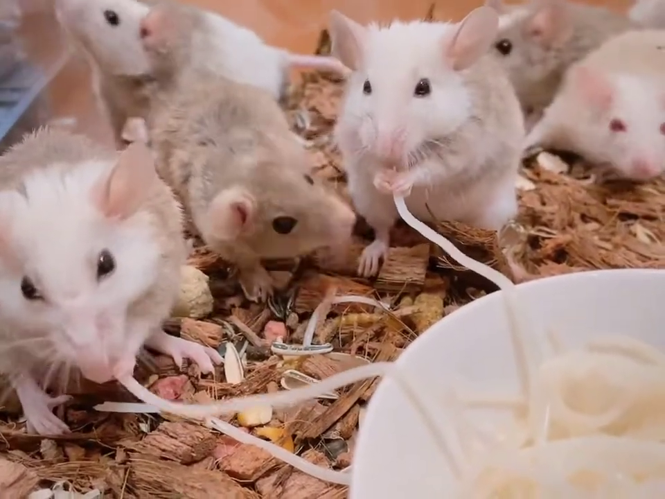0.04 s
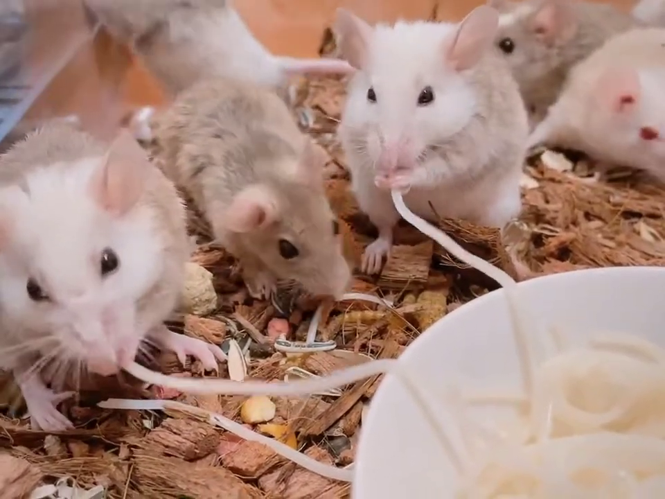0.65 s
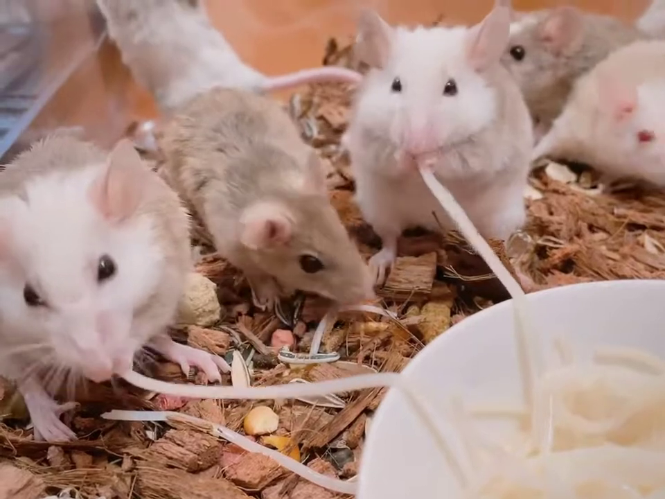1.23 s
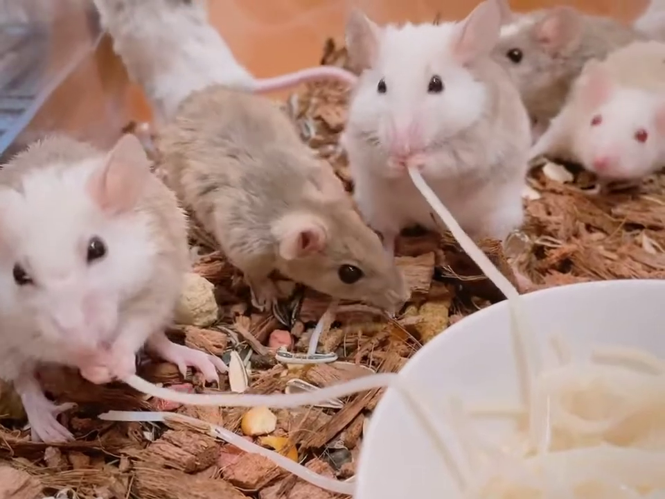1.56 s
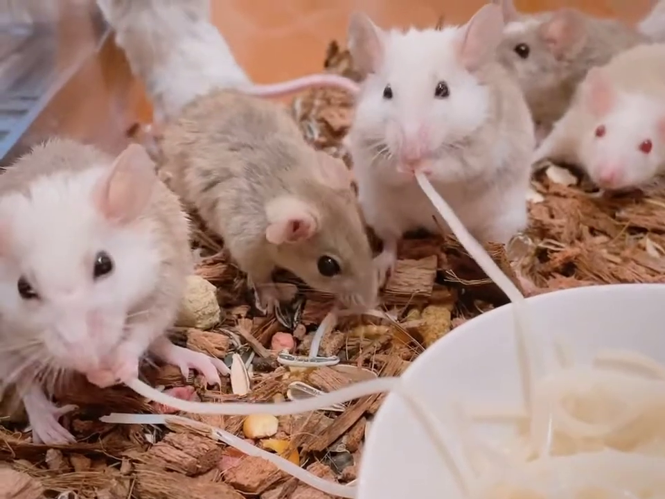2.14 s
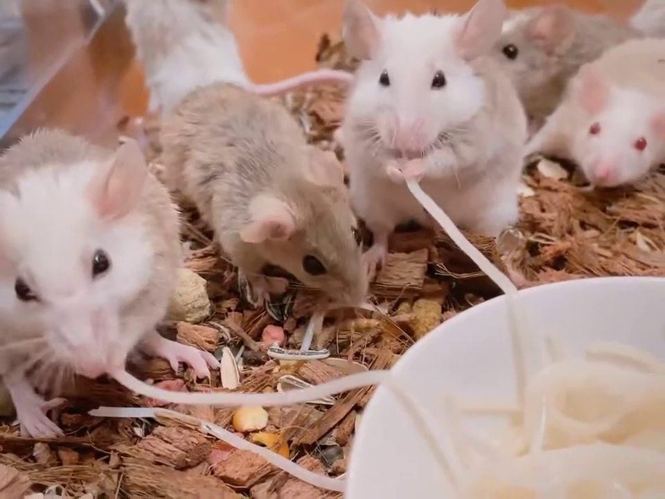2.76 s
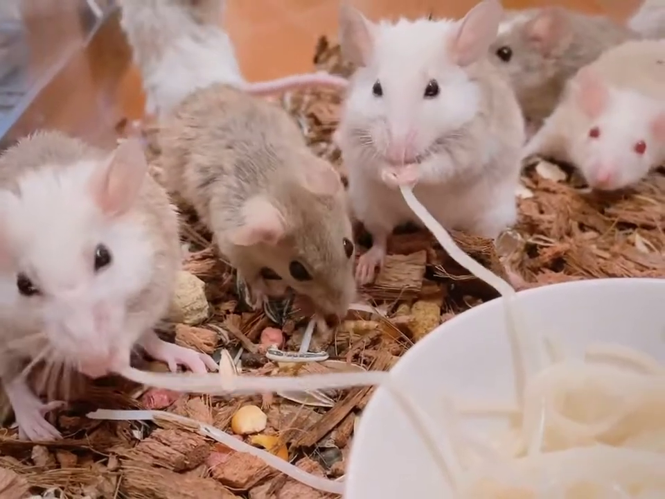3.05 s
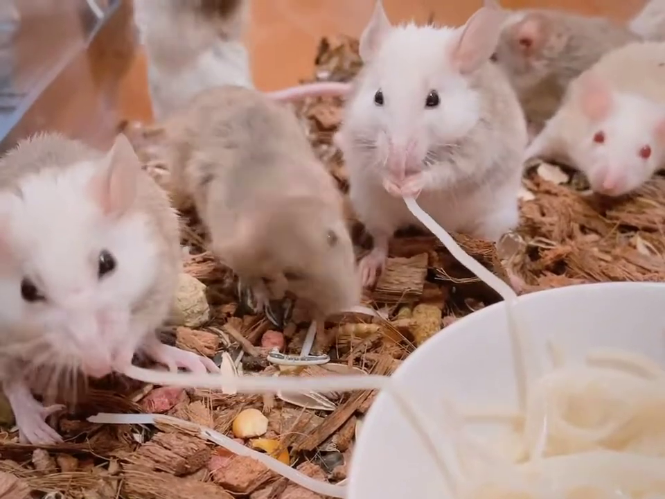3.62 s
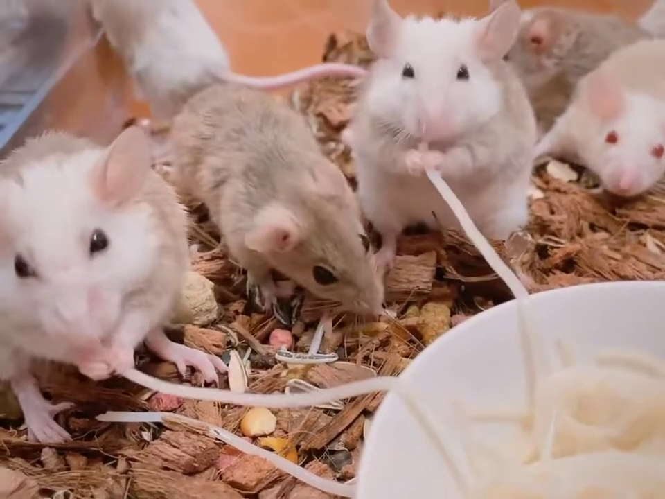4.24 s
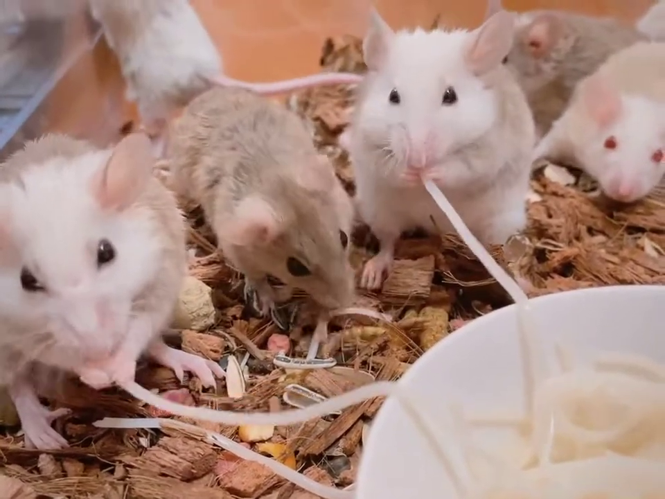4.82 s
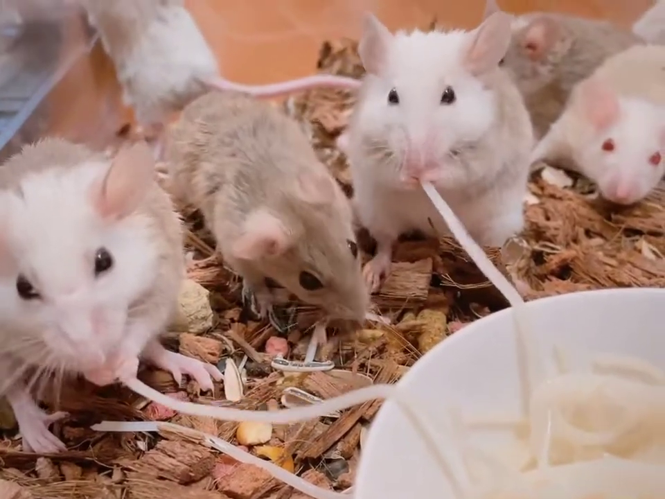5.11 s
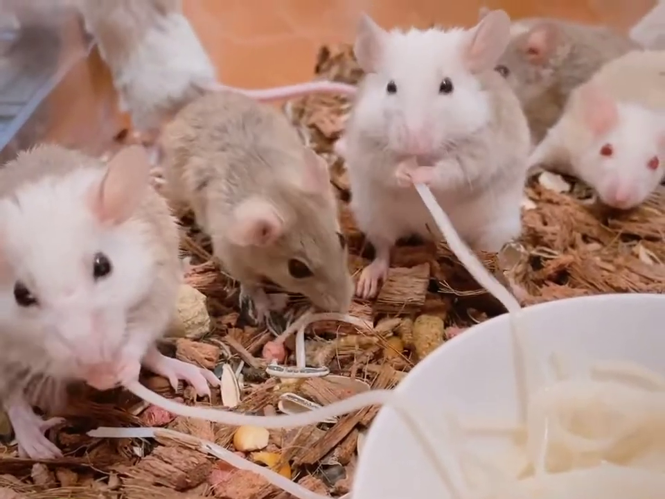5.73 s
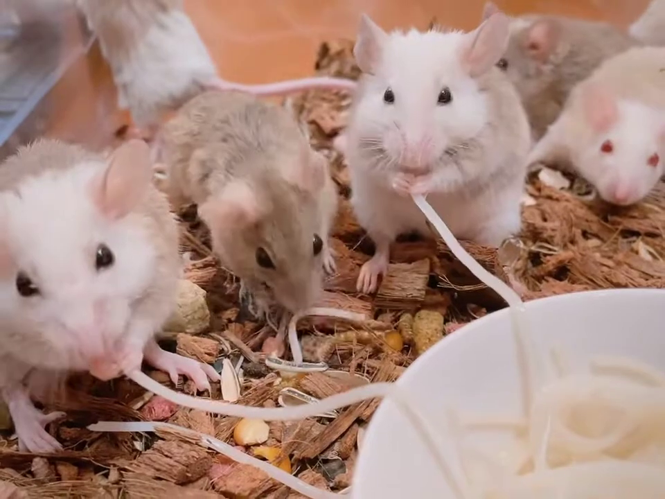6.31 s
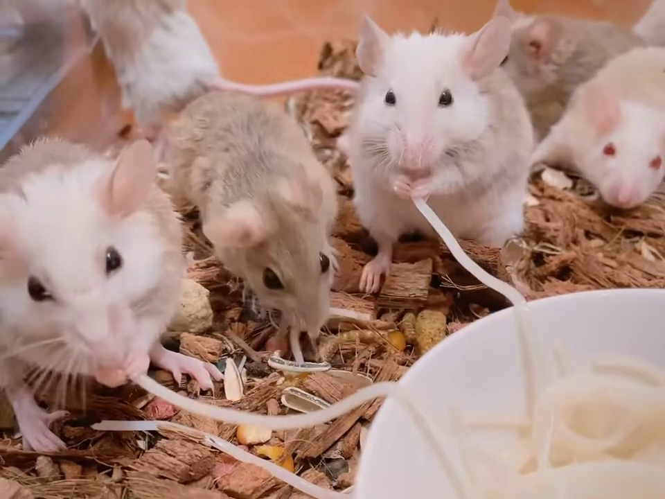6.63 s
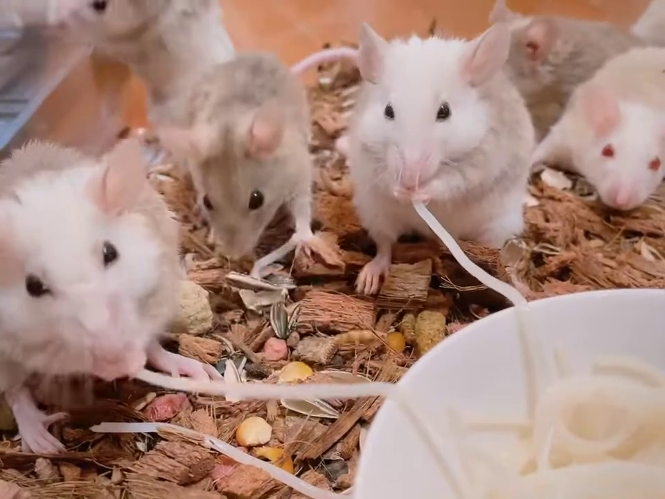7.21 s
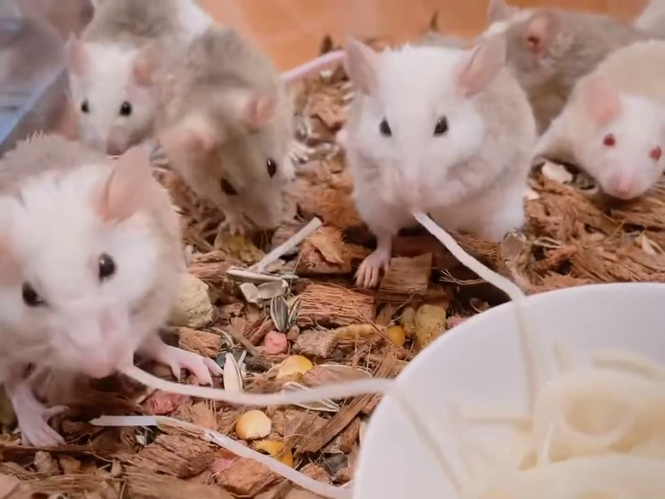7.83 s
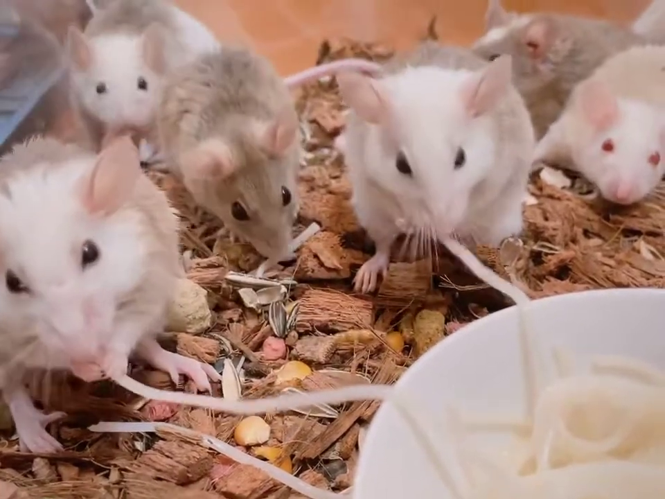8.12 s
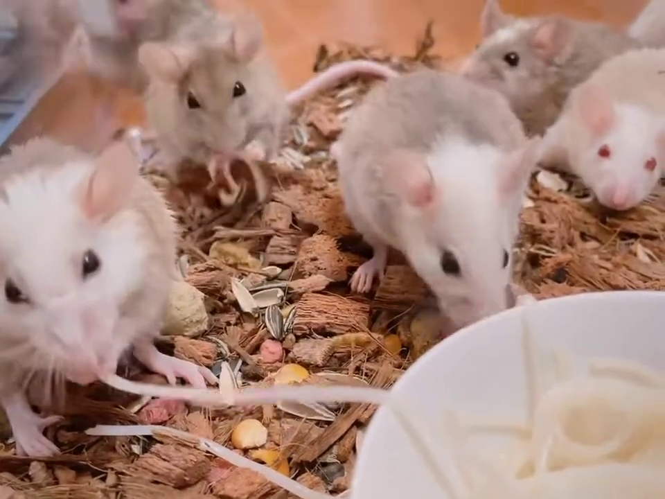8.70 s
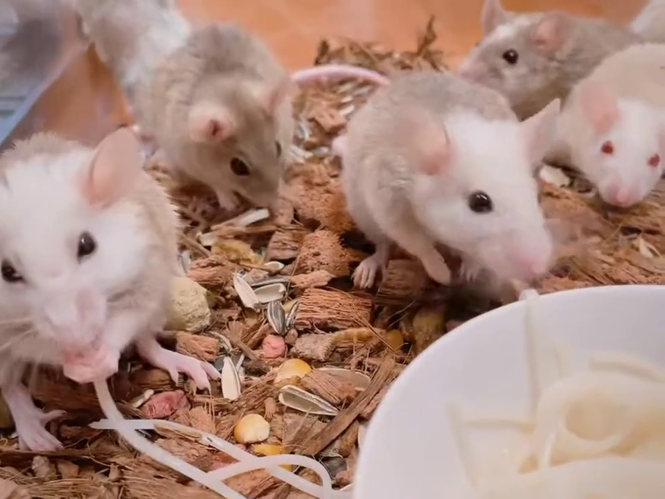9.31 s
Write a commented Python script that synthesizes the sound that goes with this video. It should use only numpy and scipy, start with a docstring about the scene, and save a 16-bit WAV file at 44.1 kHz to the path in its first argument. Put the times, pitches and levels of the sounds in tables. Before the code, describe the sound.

A fan hums steadily in a quiet room while nearby mice rustle and crackle through wood-chip bedding, dotted with tiny blips from a focus motor. A short squeak and soft knocks on the tub come first, then three crisp bites on a husk and two low thumps. A flicked chip rings lightly against something hard, and near the end a mouse squeaks twice, very high, before one more soft bump.

```python
"""A fan hums in a quiet room while mice stir wood chips in a tub, close to a camera whose focus motor
blips now and then. Chips snap and scrape throughout. Early on a mouse squeaks, fur brushes past and
the tub is bumped. Just after 3 s teeth crack a seed husk, and the two hardest thuds follow.
Near 7 s a flicked chip makes something hard ring. Near 9 s come two more thin squeaks,
then one last scuff and bump."""
import sys
import numpy as np
from scipy import signal
from scipy.fft import rfft, irfft, next_fast_len
from scipy.io import wavfile
from scipy.ndimage import map_coordinates

SR = 44100
rng = np.random.default_rng(int(sys.argv[2]) if len(sys.argv) > 2 else 0)


def output_pcm(signal):
    """Save a mono or channel-first signal as 16-bit PCM at the path in sys.argv[1].

    Samples are clipped to [-1, 1] before scaling.
    """
    pcm = np.clip(np.atleast_2d(signal).T, -1, 1) * 32767
    wavfile.write(sys.argv[1], SR, np.round(pcm).astype(np.int16))


N = 421596


def amp(db):
    """Turn decibels into a number to multiply by."""
    return 10 ** (np.asarray(db) / 20)


def unit(x):
    """Scale x to an average strength (rms) of 1."""
    return x / np.sqrt(np.mean(x ** 2) + 1e-20)


def along(points, hz):
    """Read between (f/Hz, value) points, with the octaves evenly spaced."""
    f, v = np.transpose(points)
    return np.interp(np.log(hz + 1), np.log(f + 1), v)


def resonances(modes, f):
    """Gain at frequencies f for an object that favours a few pitches, its modes."""
    return np.sqrt(sum(amp(db) ** 2 / (1 + (2 * (f - hz) / width) ** 2) ** 2 for hz, width, db in modes))


def wobble(rate, size=N):
    """A smooth curve through `rate` random values a second."""
    values = rng.standard_normal(int(size * rate / SR) + 4)
    return map_coordinates(values, [np.arange(size) * rate / SR])


def filtered(x, response):
    """Turn each frequency f in x up or down by response(f)."""
    padded = next_fast_len(len(x) + 8192)
    return irfft(rfft(x, padded) * response(np.fft.rfftfreq(padded, 1 / SR)), padded)[:len(x)]


def band(x, centre_hz, octaves):
    """Keep the part of x around one pitch, at strength 1; more octaves make it wider."""
    return unit(filtered(x, lambda hz: np.exp(-.5 * (np.log2((hz + 1) / centre_hz) / octaves) ** 2)))


def ringing_noise(size, modes, plain=0):
    """Noise coloured by an object's modes, at strength 1; `plain` fills the gaps between them."""
    return unit(filtered(rng.standard_normal(size), lambda f: np.hypot(plain, resonances(modes, f))))


def grains(size, rate, spread_db):
    """Tiny cracks at random moments, about `rate` a second, a few much louder than the rest."""
    cracks = (rng.random(size) < rate / SR) * rng.standard_normal(size)
    return unit(cracks * amp(spread_db * rng.standard_normal(size).clip(-2, 2)))


def add(track, s, sound):
    """Mix a sound into the track, starting at s seconds."""
    start = max(round(s * SR), 0)
    track[start:start + len(sound)] += sound[:max(N - start, 0)]


# how long the room echoes: f/Hz, t60/s (t60 is the time a sound takes to fade by 60 dB)
ROOM_FADE = [(200, 0.4), (2000, 0.13), (14000, 0.1)]
def room(x):
    """The walls give a short, blurred echo whose high notes die first."""
    hz, t, spectrum = signal.stft(rng.standard_normal(SR // 2), SR, nperseg=256)
    fade = amp(-60 * t / along(ROOM_FADE, hz)[:, None])
    tail = signal.istft(spectrum * fade, SR, nperseg=256)[1]
    return signal.fftconvolve(x, tail / np.linalg.norm(tail))[:N]


# hum of the fan and the mains: f/Hz, relative level/dB
HUM_TONES = [(74, -51), (100, -46), (119, -56.5), (139, -48), (199.5, -45.5), (234.5, -47.5), (254, -55),
             (317, -56), (351, -51), (703, -60.5), (763, -65.5), (1089, -70.5), (1771, -76)]
# rush of air in the room, from low to high: f/Hz, relative level/dB
AIR_COLOUR = [(20, -14), (40, -5), (70, -9), (120, 0), (170, -1), (260, -0.5), (370, -1.5), (425, -13.5),
              (470, -4.5), (800, -12.5), (980, -22), (2300, -21), (2560, -30), (2950, -29), (3150, -33.5),
              (5000, -36.5), (11000, -56), (16000, -48)]
# pitches at which the fan's case rings: f/Hz, width/Hz, relative level/dB
FAN_CASE_MODES = [(473, 89, -3.5), (537, 60, 6.5), (678, 31, 3), (769, 34, -0.5), (1077, 72, -6.5),
                  (1185, 42, -2.5), (1271, 47, -2.5), (1324, 430, -7), (1716, 126, -9.5), (1770, 45, -3),
                  (1899, 31, -5.5), (2330, 94, -10), (2770, 110, -14.5), (4230, 320, -27)]
def fan():
    """The motor's tones waver over rushing air, some of which rings in the fan's case."""
    t = np.arange(N) / SR
    tones = np.zeros(N)
    for hz, db in HUM_TONES:
        strength = amp(db + 2.05 * wobble(7)) * np.sqrt(2)
        tones += strength * np.sin(2 * np.pi * hz * t + .9 * wobble(9))
    air = unit(filtered(rng.standard_normal(N), lambda hz: amp(along(AIR_COLOUR, hz))))
    return amp(-1.5) * tones + amp(-42.5) * air + amp(-50) * ringing_noise(N, FAN_CASE_MODES)


# how much the hand sways: t/s, relative level/dB
HAND_SWAY = [(0.0, -56), (1.17, -48.5), (2.23, -60), (3.19, -52), (3.7, -48), (4.44, -64), (9.56, -76)]
def hand_rumble():
    """The camera rumbles faintly as the hand holding it moves."""
    level_db = np.interp(np.arange(N) / SR, *np.transpose(HAND_SWAY)) + 4
    return amp(level_db) * band(rng.standard_normal(N), centre_hz=74, octaves=.47)


# moves of the focus motor: middle t/s, level/dB, top f/Hz, length/s
FOCUS_MOVES = [(0.034, -34, 810, .013), (0.04, -33.5, 1126, .016), (0.648, -31.5, 810, .009),
               (0.658, -33.5, 1097, .02), (0.965, -35, 803, .018), (0.967, -39, 1065, .016),
               (1.293, -35, 830, .011), (1.597, -43, 1050, .008), (3.248, -36, 825, .006),
               (3.253, -36, 1115, .016), (4.1875, -33.5, 1110, .018), (4.670, -31, 835, .006),
               (4.674, -34, 1075, .011), (5.083, -37, 825, 0.009), (5.303, -33.5, 1134, .013),
               (5.588, -29, 815, 0.012), (6.065, -33.5, 865, .007), (6.58, -31, 1120, .013),
               (7.419, -28.5, 844, .011), (7.625, -34.5, 940, .006), (7.630, -34.5, 1090, .008),
               (7.843, -35, 940, .0086), (8.11, -43, 1310, .012), (8.390, -36.5, 1190, .012),
               (8.681, -37.5, 1160, .015)]
# pitches at which the lens's gears ring: f/Hz, width/Hz, relative level/dB
GEAR_MODES = [(3540, 510, 1), (4230, 400, 1)]
def focus_motor():
    """The motor speeds up and slows again in one short blip; the lens and its gears rattle along."""
    out = np.zeros(N)
    for s, db, hz, length in FOCUS_MOVES:
        progress = np.linspace(-1, 1, int(length * SR))
        size = len(progress)
        pitch = hz * (1 - .07 * progress ** 2)  # 7% lower at both ends
        whirr = amp(db) * np.sin(2 * np.pi * np.cumsum(pitch) / SR)
        rattle = amp(-47.5) * band(rng.standard_normal(size), centre_hz=860, octaves=.44)
        gears = amp(-62) * ringing_noise(size, GEAR_MODES)
        add(out, s - length / 2, signal.windows.tukey(size, .61) * (whirr + rattle + gears))
    return out


# a mouse climbing past at the back: t/s, level/dB
FUR_LEVELS = [(0.0, -77), (0.62, -75), (0.76, -65), (0.94, -67), (1.08, -66), (1.37, -61), (1.55, -73),
              (2.2, -90)]
def fur_brush():
    """Fur sliding over chips gives a very high, fluttering hiss."""
    level_db = np.interp(np.arange(N) / SR, *np.transpose(FUR_LEVELS)) + 1.8 * wobble(28)
    return amp(level_db) * band(rng.standard_normal(N), centre_hz=14700, octaves=.14)


# how busy the mice are between single moves: t/s, relative level/dB
BUSTLE_LEVELS = [(0.0, -64.5), (1.3, -61.5), (1.49, -65), (3.03, -69), (3.33, -64.5), (4.66, -72.5),
                 (9.56, -70.5)]
# single stirs of the chips: middle t/s, level/dB, length/s
CHIP_STIRS = [(.03, -62, 0.069), (0.328, -58.5, 0.33), (0.5, -55, 0.11), (0.732, -59, 0.12),
              (.88, -58, 0.073), (1.095, -58.5, 0.18), (1.22, -58, 0.2), (1.358, -54, 0.12),
              (1.665, -58, .08), (1.747, -62, 0.16), (2.092, -51.5, 0.056), (2.293, -59, 0.092),
              (2.494, -65, 0.11), (2.61, -63, .08), (2.818, -63, 0.18), (2.967, -64, .06),
              (3.17, -63, 0.15), (3.304, -60, .06), (3.53, -61, .22), (3.94, -63.5, 0.24), (4.1, -60, 0.06),
              (4.302, -62.5, 0.12), (4.5, -64, 0.09), (4.635, -62.5, 0.16), (5.02, -58, 0.077),
              (5.298, -62, 0.092), (5.45, -62.5, .13), (5.82, -59, 0.12), (6.078, -58, 0.073),
              (6.187, -61, 0.12), (6.357, -61, .06), (6.545, -60, .13), (6.88, -66, 0.17),
              (7.284, -62, 0.17), (7.714, -61, 0.14), (8.077, -61, 0.16), (8.42, -59, 0.083),
              (8.762, -65, 0.43), (9.21, -61, 0.13), (9.366, -60.5, 0.16), (9.54, -63, 0.11)]
# crackle of the chips, from low to high: f/Hz, relative level/dB
CRACKLE_COLOUR = [(1500, 4.5), (3000, 1.5), (4000, 0.5), (5200, -1), (7500, -2.5), (10000, -9.5),
                  (16000, -49)]
# fine hiss of fur on chips, from low to high: f/Hz, relative level/dB
HISS_COLOUR = [(4000, -22), (8000, -4), (11500, -3), (13000, -1), (14500, 1), (16000, 1.5)]
def bedding():
    """Fur, feet and jaws stir the chips in short puffs: a fine hiss, and a crackle that grows with it."""
    def texture(colour, grainy):
        noise = rng.standard_normal(N) + grainy * grains(N, rate=500, spread_db=4)
        return unit(filtered(noise, lambda hz: amp(along(colour, hz))))

    t = np.arange(N) / SR
    bustle = amp(np.interp(t, *np.transpose(BUSTLE_LEVELS)) + .5 + 1.5 * wobble(19))
    puffs = sum(amp(db) ** 2 * np.exp(-(2.67 * (t - s) / length) ** 2) for s, db, length in CHIP_STIRS)
    catch_and_slip = amp(1.6 * wobble(90))
    hiss = np.sqrt(bustle ** 2 + puffs) * catch_and_slip
    crackle = amp(-60 + 1.6 * wobble(22)) * (hiss / amp(-60)) ** .39  # grows .39 dB per dB of hiss
    return crackle * texture(CRACKLE_COLOUR, grainy=.47) + hiss * texture(HISS_COLOUR, grainy=.28)


# bumps on the tub, each at its loudest moment: t/s, level/dB, rough f/Hz, pitch fall/s, fade/s
TUB_BUMPS = [(.269, -32, 289, 0.23, .012), (.472, -34, 189, 0.32, .025), (1.236, -29.5, 490, 0.23, .012),
             (1.246, -26.5, 335, 0.4, 0.026), (1.243, -23, 160, 0.22, 0.017), (1.255, -24, 131, .1, 0.0054),
             (1.271, -25.5, 219, 0.096, 0.011), (1.294, -32, 85.6, 0.11, 0.056),
             (1.360, -31, 190, .05, 0.0062), (1.718, -24, 135, 0.21, 0.01), (1.736, -25.5, 165, 0.3, 0.01),
             (1.751, -28, 151, 0.18, 0.02), (1.908, -35, 227, 0.061, 0.021),
             (3.628, -25.5, 388, 0.0292, 0.0076), (3.642, -6.5, 100.4, 0.0204, 0.014),
             (3.741, -31, 171, 0.023, 0.0063), (3.842, -30, 331.4, 0.031, 0.0055),
             (3.850, -13, 98.8, .028, 0.021), (9.5218, -28.5, 231, 0.069, 0.008),
             (9.522, -32, 520, 0.071, 0.0067)]
def bumps():
    """The tub's floor flexes. High waves arrive first, so each thud drops in pitch; loose bits rattle."""
    lead_s = .03  # time to swell before the loudest moment
    out, t = np.zeros(N), np.arange(SR // 4) / SR - lead_s
    for s, db, hz, fall, fade in TUB_BUMPS:
        rise = .242 * fade
        pitch = hz * (.361 + .654 * np.exp(-np.maximum(t, -3 * rise) / (fall / 2)))
        thud = amp(db) * np.sin(2 * np.pi * np.cumsum(pitch) / SR)
        rattle = amp(-36 + .2 * db) * band(rng.standard_normal(len(t)), centre_hz=235, octaves=.82)
        swelling = np.exp(-np.abs(t / rise / 1.37) ** 1.12)
        fading = np.exp(-np.abs(t / fade) ** 1.4)
        add(out, s - lead_s, np.where(t < 0, swelling, fading) * (thud + rattle))
    return out


# a chip hitting something hard: t/s, level/dB
CHIP_FLICKS = [(6.889, -52.5)]
# the tones that ring after it: f/Hz, relative level/dB, t60/s
CLINK_TONES = [(3768, -1, .22), (5206, -1, .2), (5700, 0, .12), (6175, 3, .36), (6620, -7, .26),
               (8200, -8, .2), (9884, -12, .22), (12060, -8, .2)]
def clinks():
    """A flicked chip sets off a few slightly unsteady tones, each dying at its own speed."""
    out, t = np.zeros(N), np.arange(SR // 2) / SR
    onset = 1 - np.exp(-t / .001)
    for s, db in CHIP_FLICKS:
        for hz, tone_db, t60 in CLINK_TONES:
            tone = np.sin(2 * np.pi * hz * t + 1.1 * wobble(110, len(t)))
            add(out, s, onset * amp(db + tone_db - 60 * t / t60) * tone)
    return out


# paws scuffing through chips: t/s, level/dB, centre f/Hz, rise/s, t60/s, grains per second
PAW_SCUFFS = [(1.229, -38.5, 480, 0.0046, 0.14, 8400), (1.227, -49, 1450, 0.0033, .1, 8100),
              (1.30, -45, 300, .015, .3, 10000), (1.861, -43.5, 1280, 0.002, 0.098, 9000),
              (1.863, -55, 4200, .003, 0.13, 4000), (1.872, -37, 330, .008, 0.13, 10300),
              (2.079, -52, 3800, 0.0042, 0.07, 3000), (3.491, -42, 1200, 0.009, 0.24, 9000),
              (3.486, -52, 4500, 0.0068, 0.17, 2500), (3.93, -59, 5000, 0.03, .2, 850),
              (5.691, -56.5, 3870, 0.0094, 0.32, 820), (6.729, -57.5, 3880, 0.03, .25, 600),
              (6.879, -51, 5000, .008, .06, 5000), (6.889, -47, 5300, 0.0012, 0.36, 3200),
              (6.8885, -54, 11000, .002, .24, 2500), (6.888, -44, 1300, 0.003, 0.37, 9400),
              (6.900, -53, 2900, .012, .25, 3300), (8.626, -55, 2980, 0.0025, 0.091, 3000),
              (8.707, -53.5, 3180, .003, 0.17, 3000), (8.876, -51.5, 12000, 0.0055, 0.26, 5000),
              (8.897, -58, 4800, .008, .12, 1500), (9.516, -36, 780, 0.004, 0.06, 8500)]
# pitches at which the hollow tub rings: f/Hz, width/Hz, relative level/dB
TUB_MODES = [(1140, 250, -1), (1680, 130, 0), (2370, 200, 3), (3800, 400, 2.5), (4900, 300, 0),
             (5270, 400, 3.5), (6230, 220, -4), (8270, 180, 0), (12200, 700, 3)]
def scuffs():
    """A paw pushes chips over each other: many tiny clicks swell and settle, ringing in the tub."""
    out, t = np.zeros(N), np.arange(SR // 2) / SR
    for s, db, hz, rise, t60, rate in PAW_SCUFFS:
        stroke = np.minimum(t / rise, 1) * amp(db - 60 * np.maximum(t - rise, 0) / t60)
        chips = grains(len(t), rate, spread_db=3)
        in_tub = filtered(chips, lambda f: np.hypot(1, resonances(TUB_MODES, f)))
        add(out, s, stroke * band(in_tub, hz, octaves=.72))
    return out


# a mouse's squeaks: t/s, length/s, level/dB, starting f/Hz, held f/Hz
MOUSE_SQUEAKS = [(0.579, 0.007, -46, 7200, 6350), (0.5812, 0.0074, -43.5, 5380, 3930),
                 (0.584, .014, -50, 4600, 4200), (8.884, .026, -44.5, 13300, 9770),
                 (8.924, .012, -47, 11500, 11650)]
def squeaks():
    """A mouse gives thin, slightly rough whistles that slide quickly onto a held pitch and fade."""
    slide_s, fade_db = .0028, 7.5
    out = np.zeros(N)
    for s, length, db, start_hz, held_hz in MOUSE_SQUEAKS:
        t = np.arange(int(length * SR)) / SR
        pitch = held_hz + (start_hz - held_hz) * np.exp(-t / slide_s)
        roughness = 1 + .036 * wobble(1380, len(t))
        whistle = np.sin(2 * np.pi * np.cumsum(pitch * roughness) / SR)
        add(out, s, amp(db - fade_db * t / length) * signal.windows.tukey(len(t), .15) * whistle)
    return out


def settling_ticks(count):
    """Settling chips tick faintly at random moments: extra rows for CHIP_SNAPS below."""
    return [(when * N / SR, -60 + 4 * (size - .5), 8500 * 2 ** (1.5 * (pitch - .5)), .5, .014)
            for when, size, pitch in rng.random((count, 3))]


# chips breaking: t/s, relative level/dB, centre f/Hz, width/octaves, t60/s
CHIP_SNAPS = [(.140, -47, 12000, 0.86, 0.046), (.269, -45, 3500, 0.44, 0.027), (.293, -50, 8200, .25, .02),
              (0.325, -40, 7950, .22, 0.017), (1.445, -42, 12000, .5, .016), (1.862, -38, 6500, 1.6, 0.028),
              (2.065, -45, 14000, .2, .014), (2.300, -49, 11500, .6, .02), (2.484, -50, 11500, .5, .008),
              (2.491, -42, 11500, 0.44, .008), (2.940, -49, 4000, .3, .03), (3.517, -47, 8000, .8, .008),
              (4.098, -50, 3450, .15, .03), (4.165, -49, 13500, .25, .012), (4.317, -47.5, 7000, 0.85, .04),
              (5.128, -51, 4000, 0.33, 0.069), (5.270, -49, 10000, 0.87, .025),
              (5.665, -53, 12000, 0.59, .03), (5.752, -56, 6050, .06, .2), (6.1735, -46, 10500, .5, .015),
              (6.216, -46, 6200, .3, .017), (6.2562, -35.5, 11500, .9, 0.017), (6.295, -51, 8000, .5, .012),
              (6.890, -41, 5500, .9, .02), (6.908, -41, 5500, .7, .006), (7.084, -45, 12000, .6, .01),
              (8.603, -50, 6500, .5, .015), (8.627, -47, 3200, 0.46, .025), (8.673, -48, 5000, 0.76, .02),
              (8.709, -43.5, 3900, 0.45, 0.033), (9.138, -45, 12000, 0.69, .015),
              (9.341, -47.5, 10900, 0.76, .049)]
# pitches at which a chip rings: f/Hz, width/Hz, relative level/dB
CHIP_MODES = [(4230, 500, 3), (6070, 210, 7), (7400, 350, 4), (8740, 350, 2), (9230, 500, -3),
              (10900, 300, -9), (13150, 550, 3), (14000, 350, 6), (15600, 450, 1)]
def snaps():
    """A chip breaks with a short burst of noise and a woody knock, then rings on faintly."""
    ring_t60_s = .072
    out, t = np.zeros(N), np.arange(SR // 4) / SR
    for s, db, hz, octaves, t60 in CHIP_SNAPS + settling_ticks(count=44):
        crack = band(ringing_noise(len(t), CHIP_MODES, plain=1), hz, octaves)
        ring = band(ringing_noise(len(t), CHIP_MODES), hz, octaves)
        knock = amp(-9) * band(rng.standard_normal(len(t)), centre_hz=2400, octaves=.86)
        onset = 1 - np.exp(-t / (.059 * t60))
        burst = amp(-60 * t / t60) * (crack + knock)
        tail = amp(-34 - 60 * t / ring_t60_s) * ring
        add(out, s, amp(db + 1) * onset * (burst + tail))
    return out


# a nearby mouse biting a husk: t/s, level/dB, centre f/Hz, t60/s, ring level against the crack/dB
HUSK_BITES = [(3.2970, -30, 11000, 0.017, -16), (3.3826, -36, 9500, 0.016, -28),
              (3.433, -34, 8300, 0.016, -30)]
# pitches at which the husk rings: f/Hz, width/Hz, relative level/dB
HUSK_MODES = [(4350, 500, 1), (6100, 600, 6), (7150, 500, 3), (8100, 400, 1), (8900, 450, 3),
              (9650, 400, 2), (11100, 700, 2), (13100, 600, 10), (14100, 500, 7), (15600, 400, 4)]
def bites():
    """Front teeth split a seed husk: a bright crack over a lower, dry snap, then a faint ring."""
    rise_s, ring_t60_s = .0012, .085
    out, t = np.zeros(N), np.arange(SR // 5) / SR
    for s, db, hz, t60, ring_db in HUSK_BITES:
        crack = band(ringing_noise(len(t), HUSK_MODES, plain=.8), hz, octaves=1.1)
        low_snap = amp(-14) * band(rng.standard_normal(len(t)), centre_hz=2000, octaves=.8)
        ring = unit(sum(amp(mode_db) * np.sin(2 * np.pi * mode_hz * t + .8 * wobble(150, len(t)))
                        for mode_hz, _, mode_db in HUSK_MODES))
        since_peak = np.maximum(t - rise_s, 0)
        burst = amp(-60 * since_peak / t60) * (crack + low_snap)
        tail = amp(ring_db - 60 * since_peak / ring_t60_s) * ring
        add(out, s, amp(db) * np.minimum(t / rise_s, 1) * (burst + tail))
    return out


def scene():
    """Mix everything; the mice's sharper sounds echo in the room, and each focus-motor blip trails on faintly."""
    clicks, gnawing, calls = snaps(), bites(), squeaks()
    scrapes = scuffs() + clinks()
    motor = focus_motor()
    echo = room(amp(-7) * clicks + amp(-10) * gnawing + amp(-6) * calls
                + amp(-2.5) * scrapes + amp(-15.5) * motor)
    mice = clicks + gnawing + calls + scrapes + bedding() + fur_brush()
    return (mice + echo + bumps() + motor + hand_rumble() + fan())[None]


def record(dry):
    """The camera cuts off the very highest sounds."""
    top_hz = 15800
    return filtered(dry[0], lambda hz: hz < top_hz)[None]


dry = scene()
out = record(dry)
output_pcm(out)
```